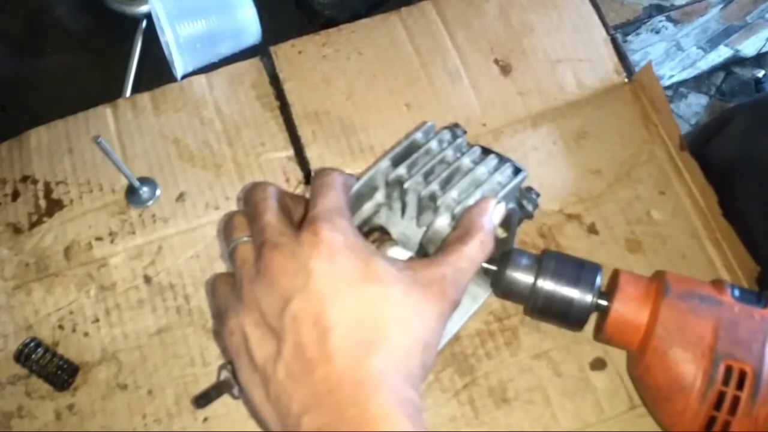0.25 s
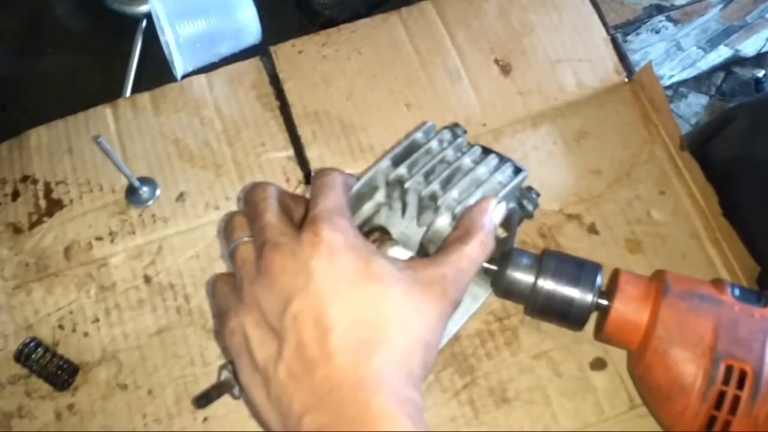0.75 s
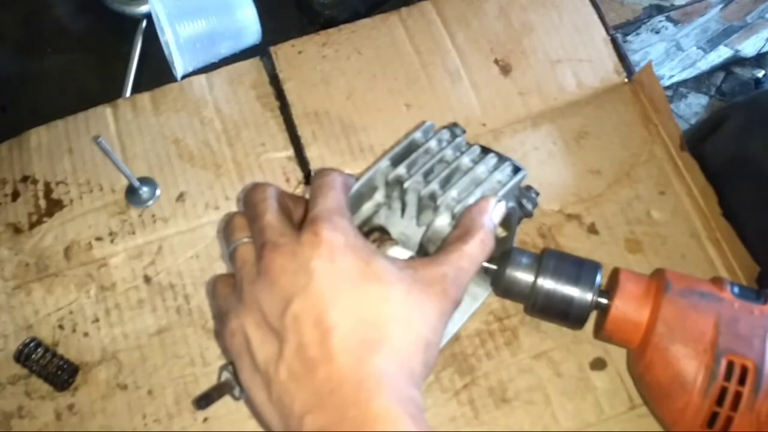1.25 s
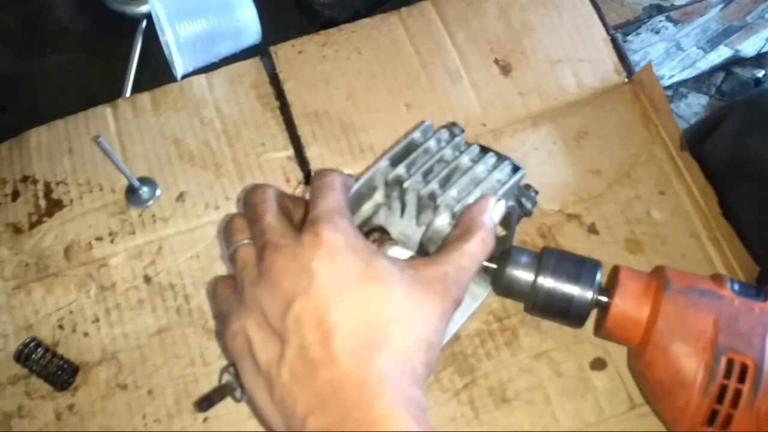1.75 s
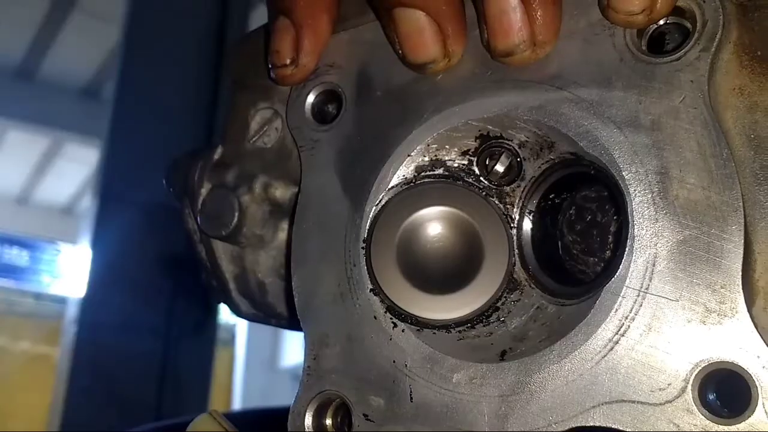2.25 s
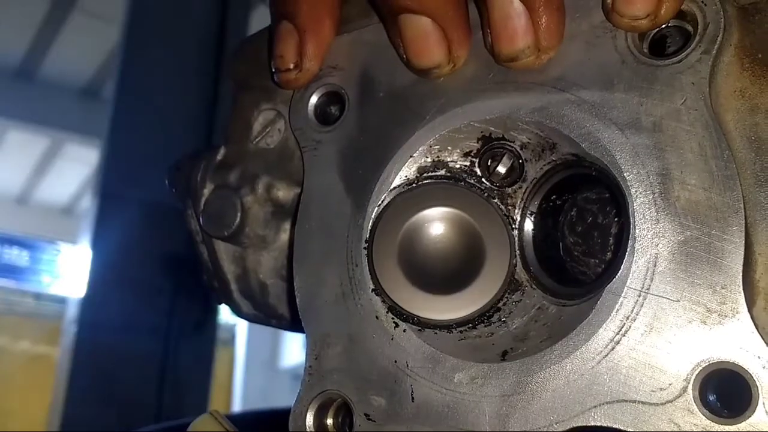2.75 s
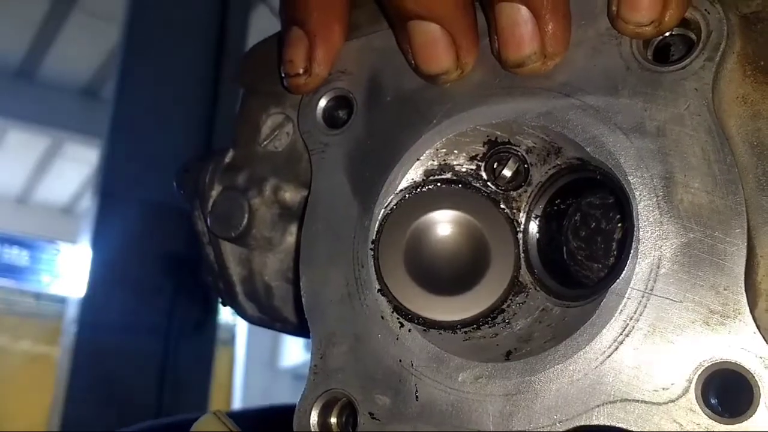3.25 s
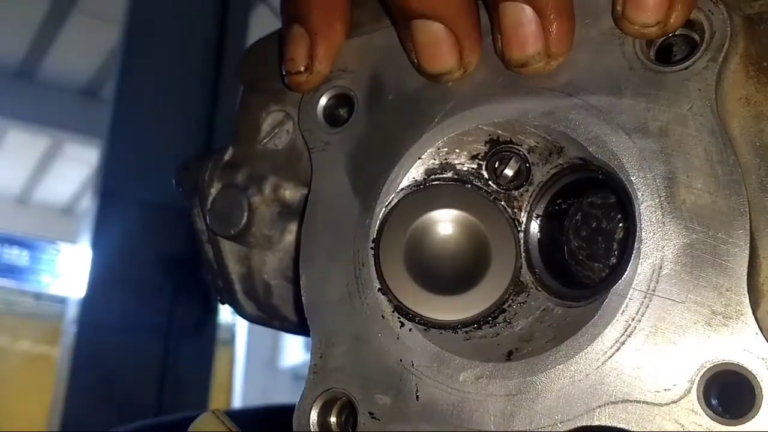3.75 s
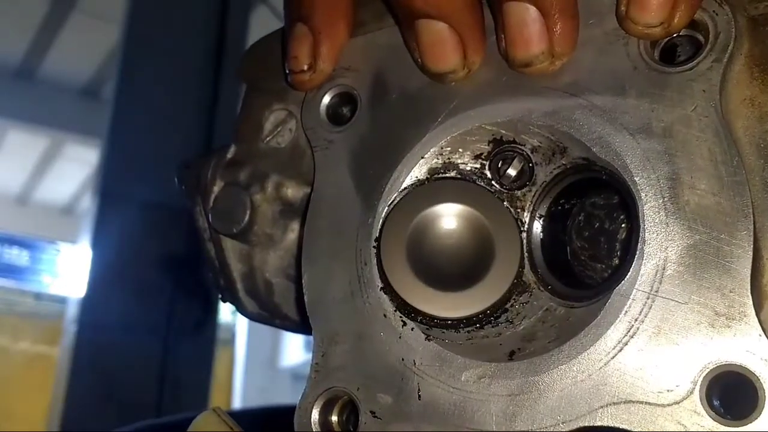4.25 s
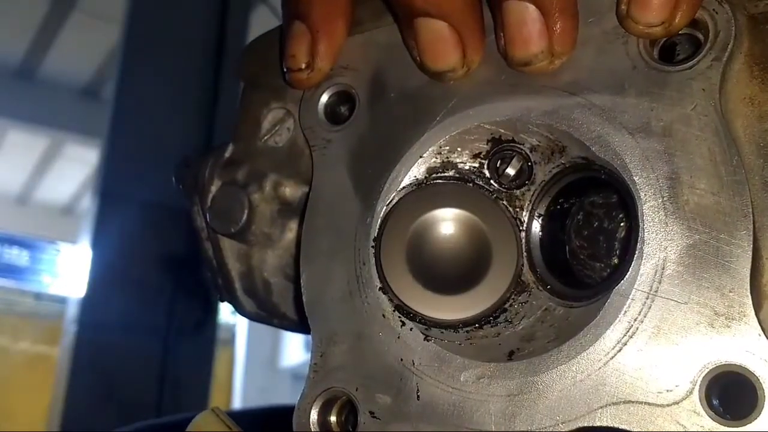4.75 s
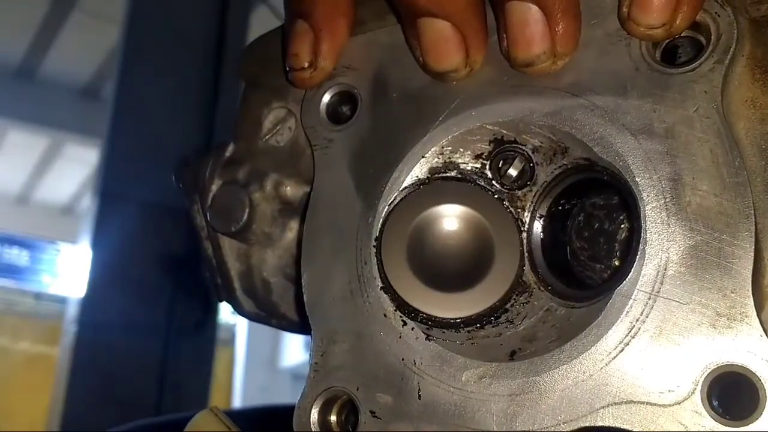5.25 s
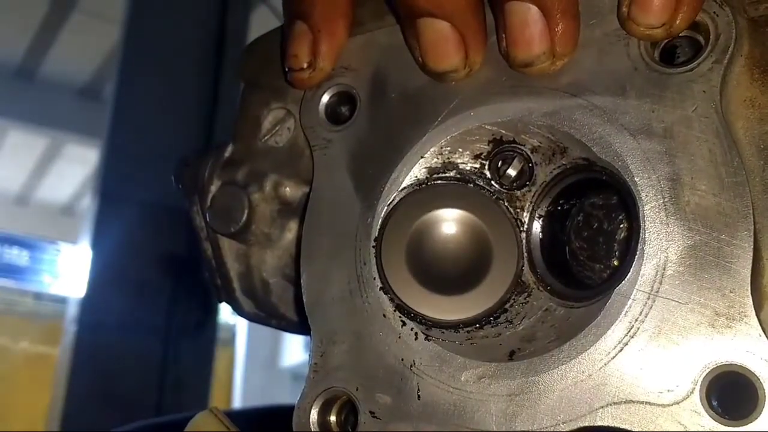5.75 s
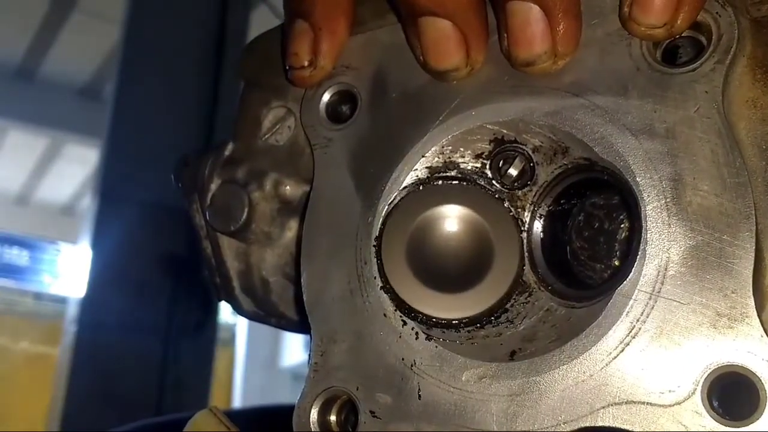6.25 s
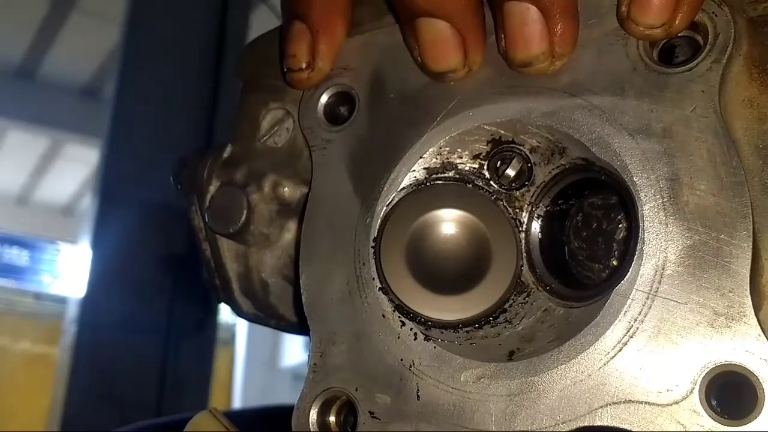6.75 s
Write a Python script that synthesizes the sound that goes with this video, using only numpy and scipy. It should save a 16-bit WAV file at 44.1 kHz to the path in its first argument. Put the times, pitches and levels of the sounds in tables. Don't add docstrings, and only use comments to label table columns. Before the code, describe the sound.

From 0 seconds a mains electric drill is already running at nearly full speed, heard from the side in a workshop: a steady tonal whine around 400 Hz and its multiples, over rough gear roar, gritty abrasive scraping and wide fan hiss, all lightly pulsed by mains buzz. Hand pressure makes small swells. At about 1.3 the trigger is let go; pitch sinks, then power returns near 1.55 and it spins up. At 1.85 the sound cuts abruptly to a close view, louder and fuller, with low uneven bench rumble and thin stem squeals. At about 2.95 the motor coasts down again, recovering from 3.2 with a rougher bite. Afterwards it grinds continuously, with rumbling knocks of emphasis near 3.5 and 4.6, slight pitch rises as the valve lifts around 4.1, 5.2 and 6, and squeals swelling near 5.1, 5.8 and 6.2. It is still running at 7 seconds.

```python
import sys
import numpy as np
from scipy import signal
from scipy.fft import rfft, irfft, next_fast_len
from scipy.io import wavfile

SR = 44100
rng = np.random.default_rng(int(sys.argv[2]) if len(sys.argv) > 2 else 0)


def ratio_of_db(decibels):
    return 10 ** (np.asarray(decibels, float) / 20)


def generate_wav(signal):
    frames = np.transpose(np.atleast_2d(signal))
    scaled = np.clip(frames, -1, 1) * 32767
    pcm = np.round(scaled).astype(np.int16)
    wavfile.write(sys.argv[1], SR, pcm)


N = 308259

CUT_S = 1.85
MAINS_BUZZ_HZ = 120

# (time [s], speed [turns/s])
RUNNING = [(0, 413), (.2, 423), (.7, 430), (1.32, 432.5), (1.84, 432.5), (1.86, 430), (2.3, 437.5),
           (2.6, 439.5), (3.0, 439), (3.5, 433), (3.8, 431.5), (4.1, 435), (4.85, 435.5), (5.1, 438),
           (6.99, 440.5)]
# (off [s], on [s], spin-up time constant [s])
RELEASES = [
    (1.315, 1.56, .29),
    (2.965, 3.22, .17),
]
COAST_HZ_PER_S, TRIGGER_S = 330, .02
# (start [s], end [s], speed gained [turns/s])
LIFTS = [
    (-.1, .7, 0),
    (1.36, 1.85, 0),
    (2.97, 3.48, 0),
    (4.06, 4.37, 13),
    (5.14, 5.43, 12.5),
    (5.91, 6.33, 12.5),
    (6.9, 7.2, 0),
]
LIFT_S, LOAD_LAG_S = .13, .15
# (time [s], change
# [dB], half length [s])
PUSHES = [(.16, -0.5, .06), (.51, 2.2, 0.028), (.69, 1.2, .06), (.95, 2, 0.082), (1.37, -1, 0.032),
          (1.5, -2.5, 0.063), (1.81, 3.5, .03), (1.855, -5, .015), (2.08, 0, 0.024), (2.31, 3, .04),
          (2.58, 1.5, .035), (2.67, -1.5, 0.039), (3.35, 1.5, 0.062), (3.8, 2, .1), (4.22, 0.1, 0.25),
          (4.34, 1, .03), (4.43, -0.8, .035), (4.74, 0.8, 0.039), (5.33, 1.2, 0.027), (5.52, -1.5, 0.072),
          (6.07, 1, 0.022), (6.17, 2, 0.053), (6.6, 1, 0.16), (6.89, -2, 0.069)]
PUSH_JITTER_DB, INRUSH_S = .5, .203

# (multiple [-], side level [dB], close level [dB], wander [turns])
ORDERS = [(6, -55, -50, .15), (8, -54, -54, .12), (12, -58, -62, .15), (14, -59, -64, .2),
          (40, -48.5, -48.5, .06)]
# (offset [Hz], side level [dB], close level [dB])
SIDEBANDS = [(-120, -10, 1), (120, 3, -2)]
FIRST_DB, FIRST_DB_PER_HZ, FIRST_KNEE_HZ = -51, .55, 431
# (side seated [dB], side lifted [dB], close seated [dB], close lifted [dB])
SECOND_DB, FOURTH_DB, SPLIT_DB = (-40, -46, -29.9, -27.3), (-35.5, -38, -28, -37), (-39, -53, -42, -52)
COASTING_DB = (-5.5, 0, -8)
SECOND_SETTLE_DB = -7
FOURTH_RIGHT_TURNS, FOURTH_LEFT_DB = (-.1, .045), (3, .5)
FULL_HZ, FOURTH_DB_PER_HZ, SQUEAL_DB_PER_HZ = 415, .12, .3

# (frequency [Hz], level [dB/Hz])
CASING_SIDE = [(200, -28), (290, -15.5), (350, -8), (550, 0), (850, 1), (1000, -0.5), (1080, -4.5),
               (1200, -1.5), (1380, -6.5), (1550, -5), (1880, 0.5), (2020, -8.5), (2800, -26)]
# (frequency [Hz], level [dB/Hz])
CASING_CLOSE = [(250, -13.5), (350, -11.5), (440, -8), (660, -4), (780, -3), (1000, 3), (1110, -2.5),
                (1180, -12.5), (1550, -6.5), (1680, -6.5), (1850, -4), (2100, -19.5), (2800, -20)]
# (frequency [Hz], level [dB/Hz])
GRIT_SIDE = [(1500, -14), (2050, -8), (2250, -1), (2800, 0), (3400, -3), (4400, -7), (5100, -4), (5600, -9),
             (6000, -30)]
# (frequency [Hz], level [dB/Hz])
GRIT_CLOSE = [(1500, -1.5), (2250, 4.5), (2400, 2.5), (2700, -1.5), (3000, -2.5), (3500, -1.5),
              (4500, -6.5), (4900, 1.5), (5400, -10), (6000, -34)]
# (frequency [Hz], level [dB/Hz])
FAN_SIDE = [(4800, -42), (5600, -4), (6100, 3), (6800, 1), (7600, 2), (8800, 0.5), (9700, 0), (10400, 1),
            (10900, -2), (14500, -2), (15300, -3), (16000, 5.5)]
# (frequency [Hz], level [dB/Hz])
FAN_CLOSE = [(4800, -34), (5500, 8), (6500, 0.5), (6900, 6), (7300, 4), (8000, -1), (8800, 3.5),
             (9700, -0.5), (10500, 0), (11500, 0), (14200, -1), (15400, 0), (16000, 2.5)]
# (side level [dB], close level [dB], share of push [-], inrush [dB])
ROAR, GRIT, FAN = (-32, -26, 1.21, 2), (-38.5, -35, .92, 0), (-37, -37, 1.14, .6)
SETTLE_DB, SETTLE_S = -5, .1

# (frequency [Hz], level [dB/Hz])
ROOM = [(20, -12), (60, 1), (110, 5), (250, 13.5), (400, -2)]
ROOM_DB = -58

# (frequency [Hz], level [dB/Hz])
BENCH = [(30, -29), (60, -25.5), (85, -13), (98, -9.5), (110, -24), (120, -1), (135, -6), (165, -0.5),
         (200, -2), (250, -11.5), (330, -26)]
# (time [s], change [dB], half length [s])
ROCKING = [(1.9, -7, 0.047), (2.26, 3.5, 0.073), (2.53, 6.5, 0.039), (2.84, 2, 0.025), (3.235, 4.5, .02),
           (3.5, 6.5, .03), (3.92, 4.6, .08), (4.46, -4, 0.11), (4.61, 9, 0.023), (5.2, -7, .03),
           (5.55, -3, .13), (6.32, 1.5, 0.025), (6.86, -4.5, 0.15)]
RUMBLE_DB, RUMBLE_LUMPS_DB, RUMBLE_COASTING_DB, RUMBLE_INRUSH_DB = -32, 1.5, -5.5, 4

# (time [s], rise [dB], half length [s])
SQUEALS = [(2.75, 5, .25), (3.848, 6, .15), (4.7, 5, .15), (5.08, 8, 0.16), (5.777, 7, 0.099),
           (6.16, 8.5, .09), (6.648, 3, .17)]
SQUEAL_DB, SQUEAL_COASTING_DB, SQUEAL_ORDER = -51.5, -10, 20

# (frequency [Hz], phase [turns])
TURN = [(40, -.45), (260, -.37), (350, -.05), (1180, .11), (1635, .27), (1700, .59), (2310, .76),
        (3280, 1.36), (4550, 1.99), (8580, 4.34), (9550, 3.98), (11880, 3.02), (13420, 2.49), (15500, 1.74)]
# (frequency [Hz], level [dB])
LEAN = [(300, 0), (450, -1), (900, 1.5), (1250, .5), (1550, -7), (1750, -4), (2100, -1), (2600, 0.1),
        (15000, .1)]
# (frequency [Hz], width [Hz], likeness lost [0-1])
PARTING = [(40, 40, .2), (300, 40, .45), (1620, 90, .7), (1900, 80, .45), (2700, 330, .7), (3750, 330, .75),
           (4800, 170, .3), (5900, 150, .45), (6750, 350, .55), (7950, 450, .8), (9150, 250, .8),
           (10120, 220, .9), (11350, 220, .65), (12800, 620, .65), (14200, 250, .65)]
# (frequency [Hz], width [Hz], level [dB])
HOUSING = [(2300, 70, -3.5), (2720, 140, 4), (3430, 390, 3), (4900, 29, -3.5), (6420, 200, 2.5),
           (7330, 130, 0.5), (9000, 110, 1), (9630, 200, -2.5), (11100, 83, -8), (11500, 120, 1),
           (12500, 250, -1.5), (13900, 300, -5), (15350, 150, -2)]
CUTOFF_HZ = 15500


def drift(rate_hz):
    r = np.exp(-80 * np.pi * rate_hz / SR)
    slow = signal.lfilter([1], [1, -2 * r, r * r], rng.standard_normal(N // 40 + 2002))[2000:]
    slow = (slow - slow.mean()) / slow.std()
    return np.interp(np.arange(N) / 40, np.arange(len(slow)), slow)


def bumps(rows):
    t = np.arange(N) / SR
    return sum(size * np.exp(-((t - s) / width) ** 2) for s, size, width in rows)


def between(start_s, end_s, edge_s):
    t = np.arange(N) / SR
    return np.clip(np.minimum(t - start_s, end_s - t) / edge_s + .5, 0, 1)


def closeness():
    return np.clip((np.arange(N) / SR - CUT_S) / .02 + .5, 0, 1)


def coloured(x, spectrum):
    ends = (1, -120), (2 * spectrum[-1][0], -120)
    hz, db = np.transpose([ends[0]] + list(spectrum) + [ends[1]])
    size = next_fast_len(N)
    gain = ratio_of_db(np.interp(np.log(np.fft.rfftfreq(size, 1 / SR) + 1), np.log(hz), db))
    out = irfft(rfft(x, size) * gain, size)[..., :N]
    return out / out.std()


def rotor():
    t, close = np.arange(N) / SR, closeness()
    turns_hz = np.interp(t, *np.transpose(RUNNING))
    for off, on, spin_up_s in RELEASES:
        coasted_s = np.clip(np.minimum(t, on) - off, 0, None)
        lost_hz = COAST_HZ_PER_S * coasted_s * np.exp(-np.maximum(t - on, 0) / spin_up_s)
        turns_hz = turns_hz - lost_hz * (1 - close * (on < CUT_S))
    r = np.exp(-1 / (LOAD_LAG_S * SR))
    gained_hz = sum(gain * between(start, end, LIFT_S) for start, end, gain in LIFTS)
    turns_hz = turns_hz + signal.lfilter([1 - r], [1, -r], gained_hz)
    current = 1 - sum(between(off, on, TRIGGER_S) for off, on, _ in RELEASES)
    lifted = sum(between(start, end, LIFT_S) * (1 - close * (end <= CUT_S)) for start, end, _ in LIFTS)
    return turns_hz, current, lifted


def whine_levels(turns_hz, current, lifted):
    close = closeness()
    levels = [FIRST_DB + FIRST_DB_PER_HZ * np.maximum(turns_hz - FIRST_KNEE_HZ, 0)]
    for peaks_db, coasting_db in zip((SECOND_DB, FOURTH_DB, SPLIT_DB), COASTING_DB):
        side_seated, side_lifted, close_seated, close_lifted = peaks_db
        side_db = side_seated + (side_lifted - side_seated) * lifted
        close_db = close_seated + (close_lifted - close_seated) * lifted + coasting_db * (1 - current)
        levels.append((1 - close) * side_db + close * close_db)
    return levels


def whine(turns_hz, current, lifted):
    first_db, second_db, fourth_db, split_db = whine_levels(turns_hz, current, lifted)
    angle, close = 2 * np.pi * np.cumsum(turns_hz) / SR, closeness()
    out = ratio_of_db(first_db + 1.2 + 2 * drift(8)) * np.sin(angle + .3 * drift(10))

    settle_db = SECOND_SETTLE_DB * between(CUT_S - SETTLE_S, CUT_S + SETTLE_S, SETTLE_S) * close
    second_gain = ratio_of_db(second_db - .4 + settle_db + 1.8 * drift(12))
    out += second_gain * np.sin(2 * angle + .33 * drift(15))

    fourth_db = fourth_db + FOURTH_DB_PER_HZ * np.minimum(turns_hz - FULL_HZ, 0)
    right_turns, left_db = [side + (near - side) * close for side, near in (FOURTH_RIGHT_TURNS, FOURTH_LEFT_DB)]
    fourth_gain = ratio_of_db(fourth_db + left_db * [[1], [0]] + 1.5 * drift(10))
    channel_phase = 2 * np.pi * right_turns * [[0], [1]]
    out = out + fourth_gain * np.sin(4 * angle + channel_phase + .35 * drift(15))

    for multiple, side_db, close_db, wander_turns in ORDERS:
        level_db = side_db + (close_db - side_db) * close + 1.5 * drift(8)
        out += ratio_of_db(level_db) * np.sin(multiple * angle + 2 * np.pi * wander_turns * drift(25))
    for offset_hz, side_db, close_db in SIDEBANDS:
        level_db = side_db + (close_db - side_db) * close + split_db + 2 * drift(7.7)
        out += ratio_of_db(level_db) * np.sin(4 * angle + 2 * np.pi * offset_hz * np.arange(N) / SR)
    return out


def layer_db(layer, push_db, inrush):
    side_db, close_db, push_share, inrush_db = layer
    return side_db + (close_db - side_db) * closeness() + push_share * push_db + inrush_db * inrush


def friction(side, close, buzz, flutter_db, uneven_db):
    contacts = rng.standard_normal((2, N)) * ratio_of_db(uneven_db * rng.standard_normal((2, N)))
    contacts = contacts * buzz * ratio_of_db(flutter_db)
    return (1 - closeness()) * coloured(contacts, side) + closeness() * coloured(contacts, close)


def casing_roar(level_db, ripple, wobble_db):
    settle_db = SETTLE_DB * between(CUT_S, CUT_S + SETTLE_S, .032)
    return ratio_of_db(level_db + settle_db) * friction(CASING_SIDE, CASING_CLOSE, 1 + .15 * ripple, .87 * wobble_db, 1.0)


def seat_grit(level_db, ripple, wobble_db):
    flutter_db = wobble_db + .43 * drift(4)
    return ratio_of_db(level_db) * friction(GRIT_SIDE, GRIT_CLOSE, 1 + .14 * ripple, flutter_db, 0.0)


def fan_hiss(level_db, ripple):
    return ratio_of_db(level_db) * friction(FAN_SIDE, FAN_CLOSE, 1 + .04 * ripple, .45 * drift(35), 1.0)


def room_tone():
    return ratio_of_db(ROOM_DB) * coloured(rng.standard_normal((2, N)), ROOM)


def bench_rumble(current, inrush):
    level_db = RUMBLE_DB + bumps(ROCKING) + RUMBLE_COASTING_DB * (1 - current) + RUMBLE_INRUSH_DB * inrush
    gain = closeness() * ratio_of_db(level_db + RUMBLE_LUMPS_DB * drift(8.3))
    return gain * coloured(rng.standard_normal((2, N)), BENCH)


def stem_squeal(turns_hz, current):
    angle = 2 * np.pi * SQUEAL_ORDER * np.cumsum(turns_hz) / SR
    level_db = SQUEAL_DB + bumps(SQUEALS) + SQUEAL_COASTING_DB * (1 - current)
    level_db = level_db + SQUEAL_DB_PER_HZ * np.minimum(turns_hz - FULL_HZ, 0)
    return closeness() * ratio_of_db(level_db) * (drift(170) * np.sin(angle) + drift(170) * np.cos(angle))


def spread_stereo(common, apart, tones):
    size = next_fast_len(N + 4096)
    hz = np.fft.rfftfreq(size, 1 / SR)
    kept = [1 - lost * np.exp(-((hz - at_hz) / width_hz) ** 2) for at_hz, width_hz, lost in PARTING]
    share = .985 * np.prod(kept, axis=0)
    housing_db = sum(db * np.exp(-((hz - at_hz) / width_hz) ** 2) for at_hz, width_hz, db in HOUSING)
    turn = np.exp(2j * np.pi * np.interp(hz, *np.transpose(TURN)))
    lean = ratio_of_db(np.interp(hz, *np.transpose(LEAN)) / 2)
    noise, clean = rfft(common, size), rfft(tones, size)
    left = noise + clean[0]
    right = turn * (share * noise + clean[1]) + np.sqrt(1 - share ** 2) * rfft(apart, size)
    return irfft(ratio_of_db(housing_db) * np.array([left * lean, right / lean]), size)[:, :N]


def scene():
    turns_hz, current, lifted = rotor()
    push_db = bumps(PUSHES) + PUSH_JITTER_DB * drift(9.6)
    inrush = sum(between(on, on + INRUSH_S, TRIGGER_S) for _, on, _ in RELEASES)
    ripple = current * np.cos(2 * np.pi * MAINS_BUZZ_HZ * np.arange(N) / SR + .8 * drift(3))
    wobble_db = .17 * drift(1.2) + .72 * drift(44)

    tones = whine(turns_hz, current, lifted)
    noise = casing_roar(layer_db(ROAR, push_db, inrush), ripple, wobble_db)
    noise = noise + seat_grit(layer_db(GRIT, push_db, inrush), ripple, wobble_db)
    noise = noise + fan_hiss(layer_db(FAN, push_db, inrush), ripple)
    room = room_tone()
    noise = noise + bench_rumble(current, inrush)
    tones = tones + stem_squeal(turns_hz, current)
    common, apart = noise
    return spread_stereo(common, apart, tones) + room


def top_cut(x):
    return signal.sosfilt(signal.butter(12, 16810, fs=SR, output="sos"), x)


def record(dry):
    size = next_fast_len(N)
    passed = np.fft.rfftfreq(size, 1 / SR) < CUTOFF_HZ
    mix = irfft(rfft(dry, size) * passed, size)[:, :N]
    return top_cut(mix)


dry = scene()
out = record(dry)
generate_wav(out)
```